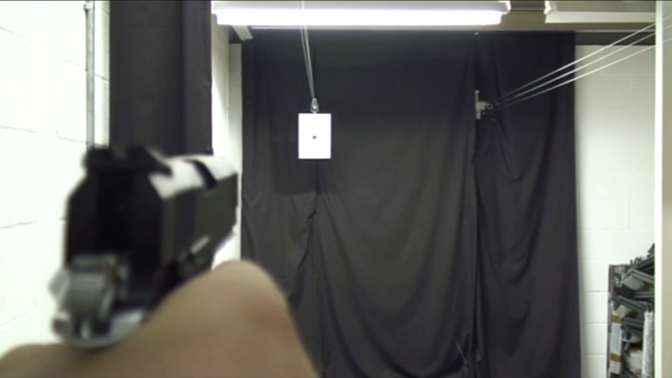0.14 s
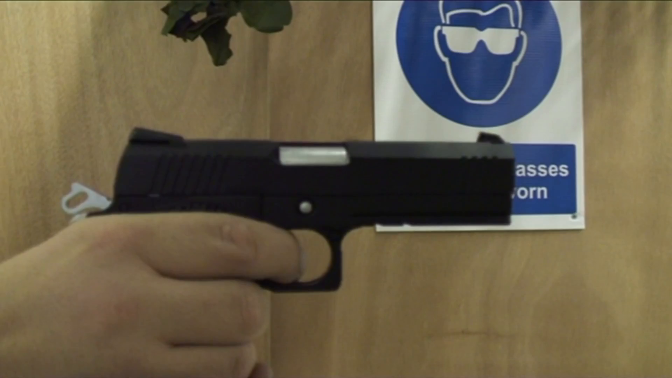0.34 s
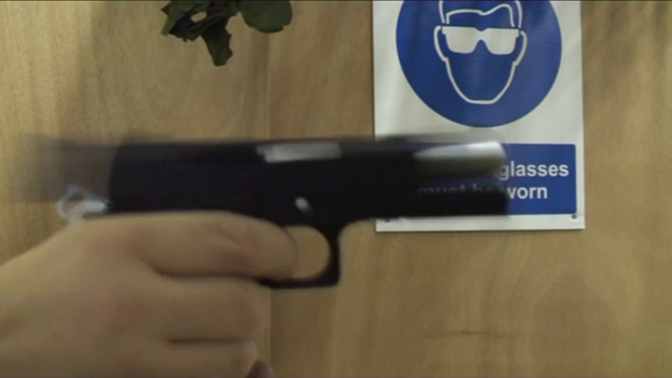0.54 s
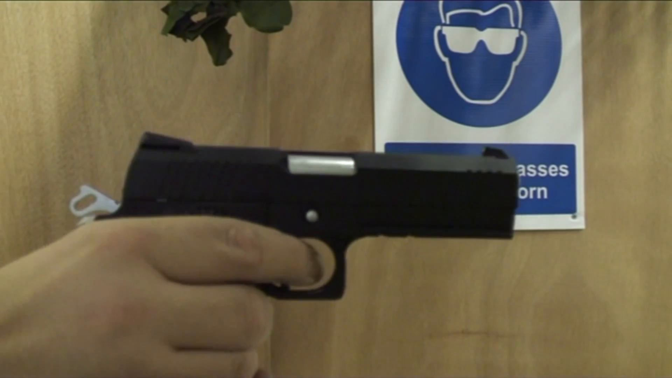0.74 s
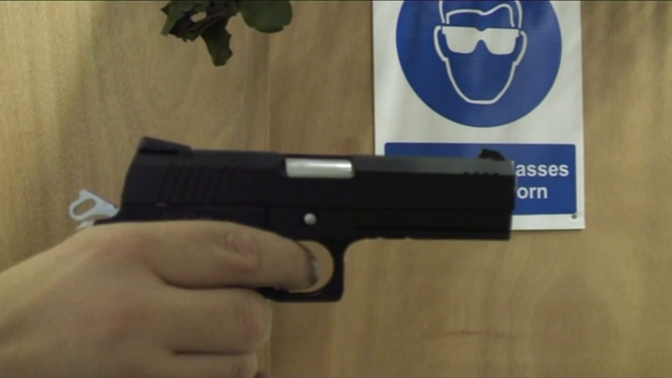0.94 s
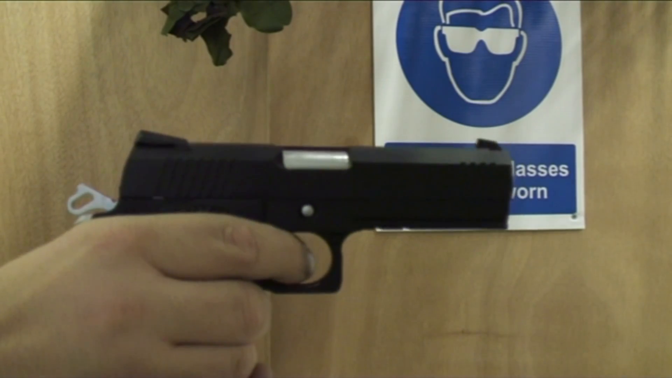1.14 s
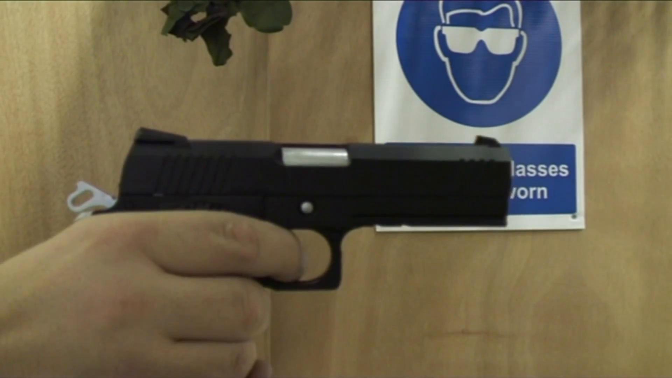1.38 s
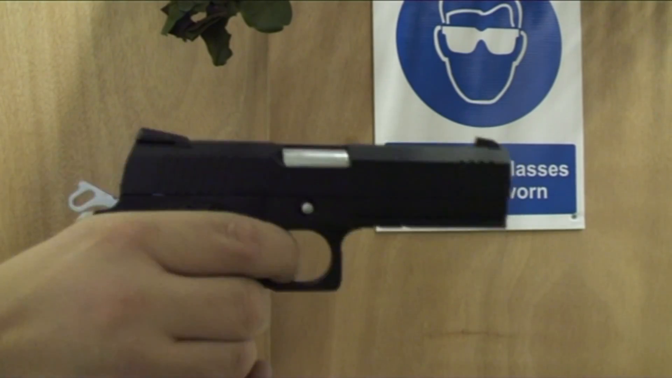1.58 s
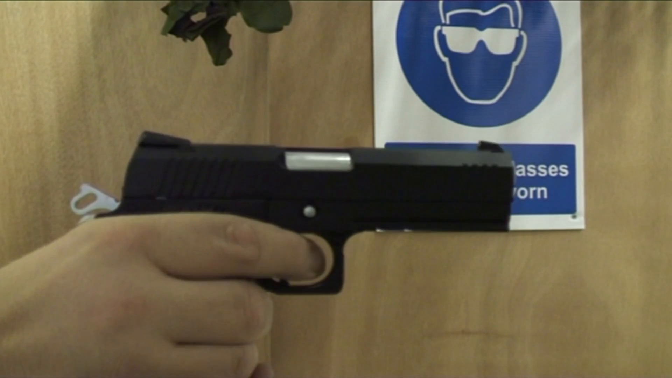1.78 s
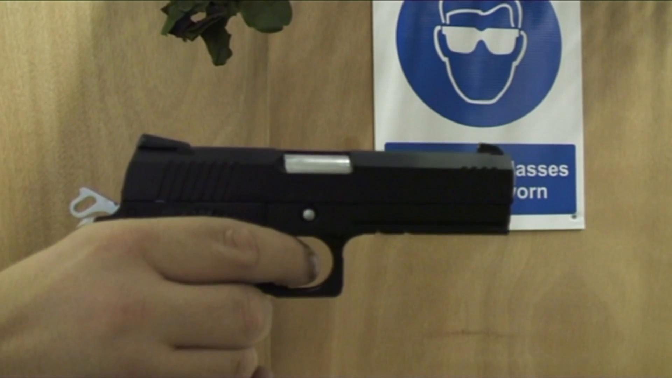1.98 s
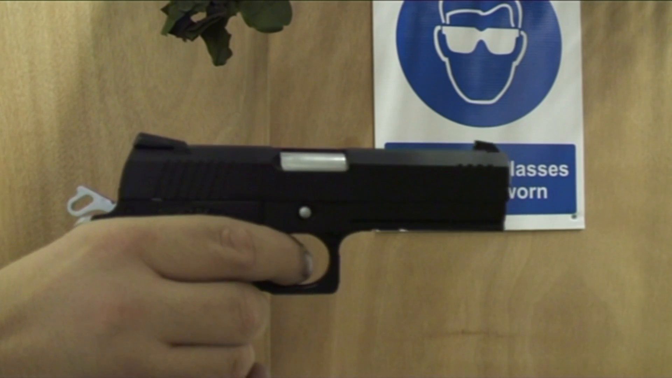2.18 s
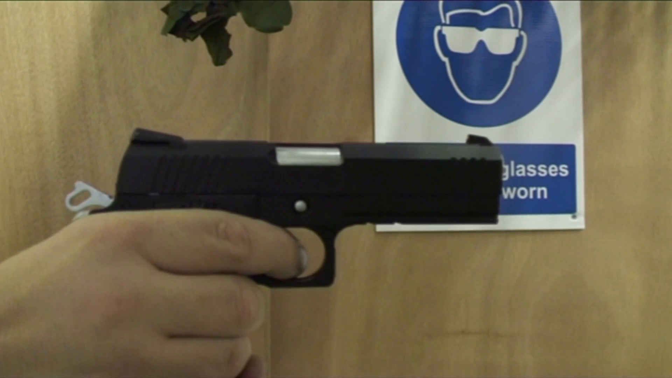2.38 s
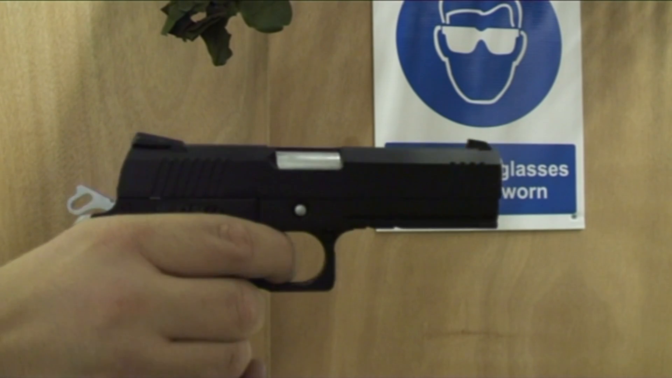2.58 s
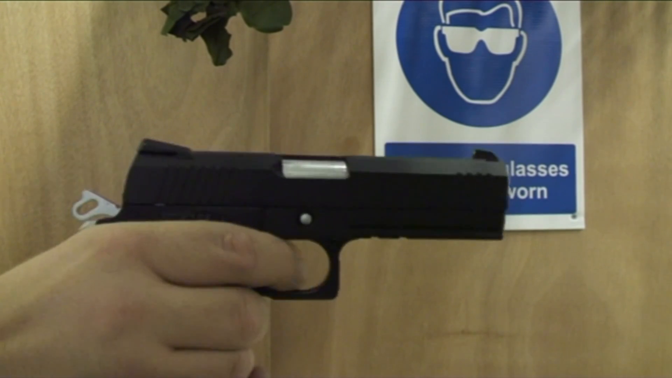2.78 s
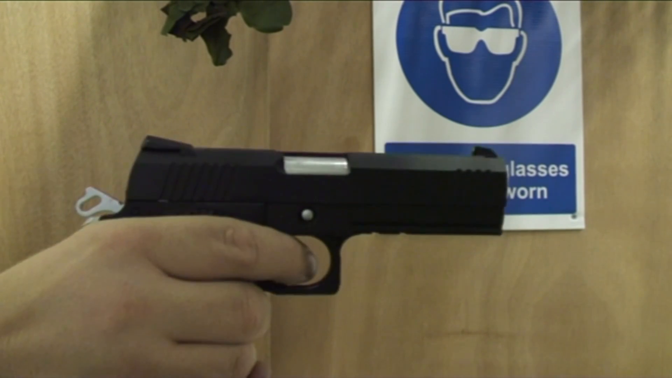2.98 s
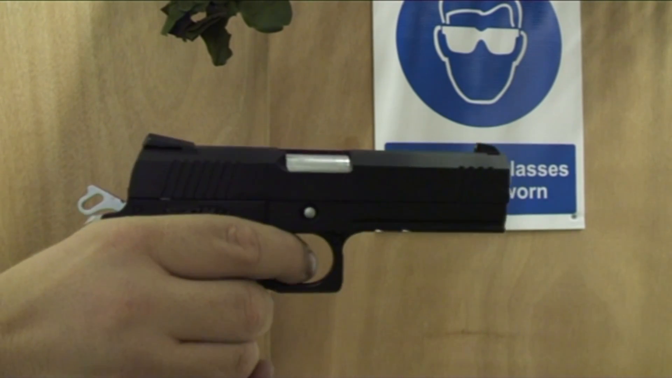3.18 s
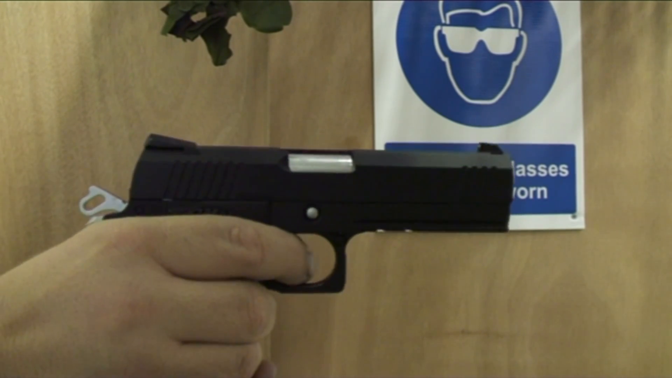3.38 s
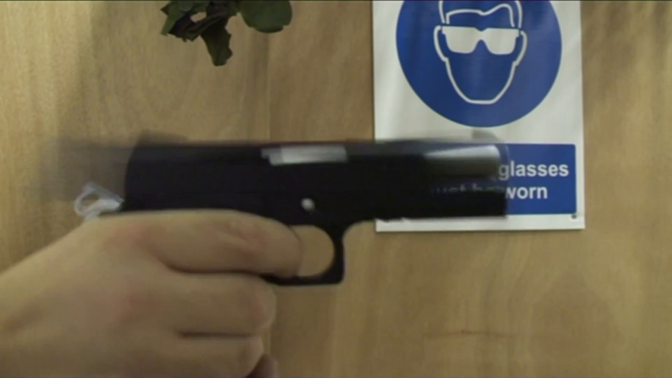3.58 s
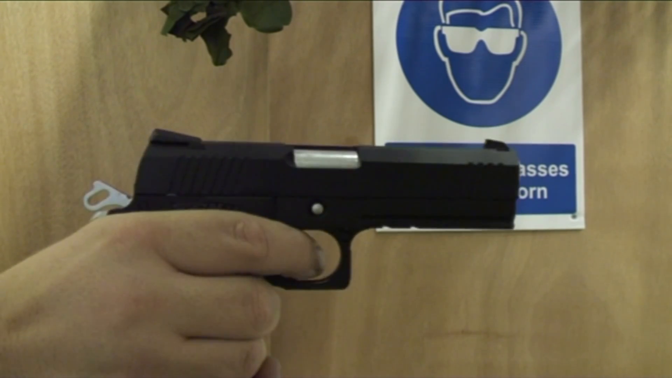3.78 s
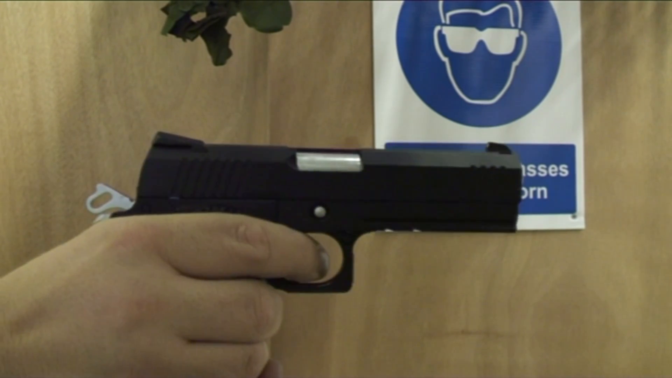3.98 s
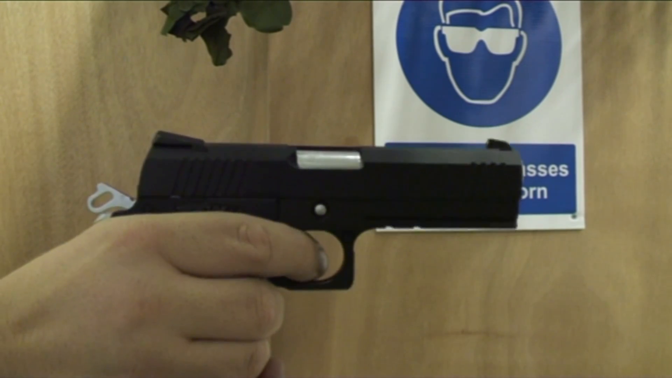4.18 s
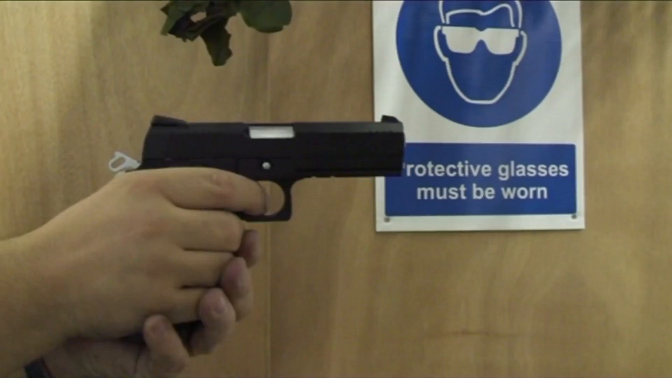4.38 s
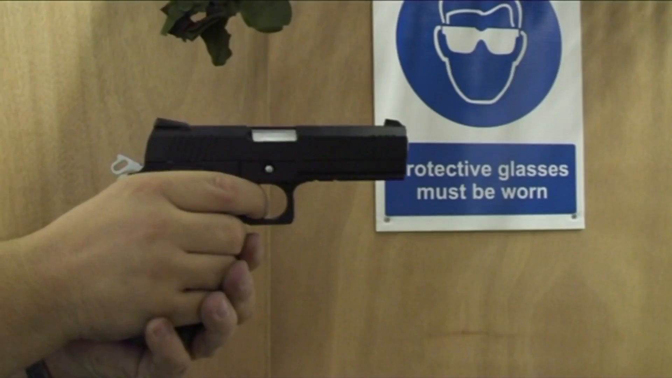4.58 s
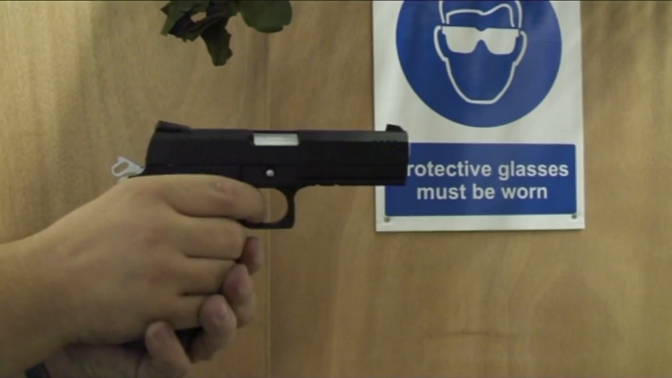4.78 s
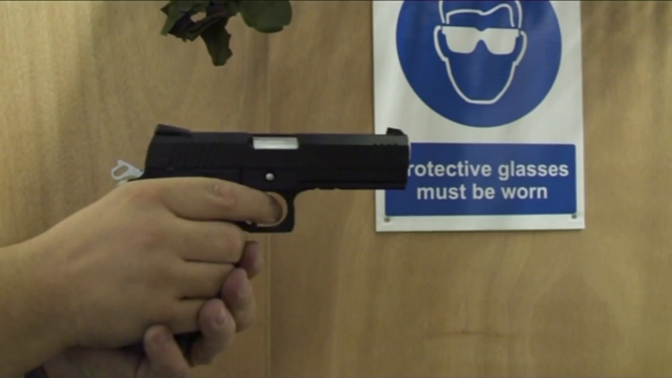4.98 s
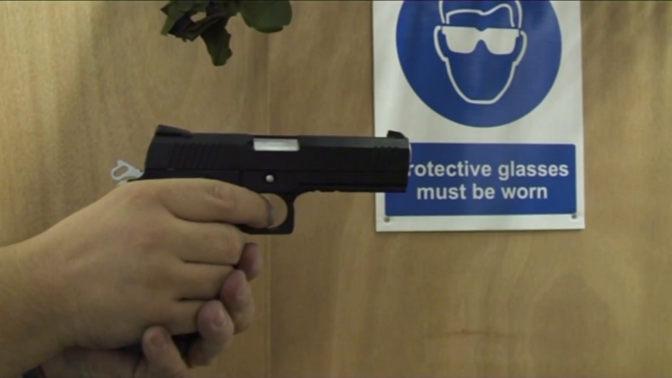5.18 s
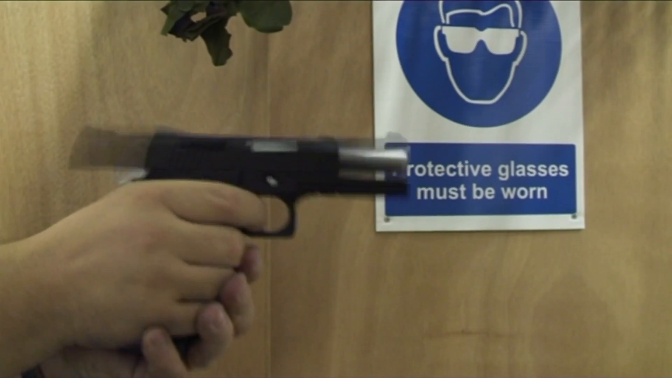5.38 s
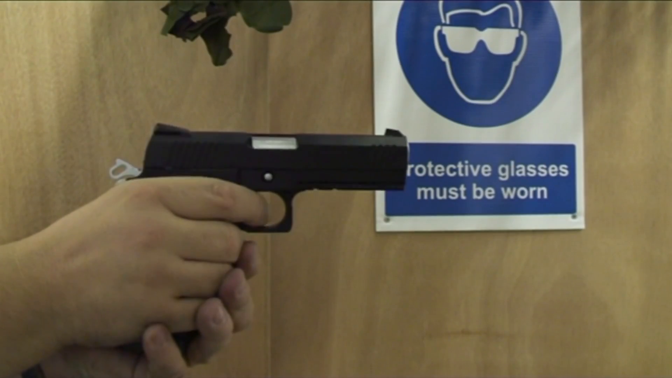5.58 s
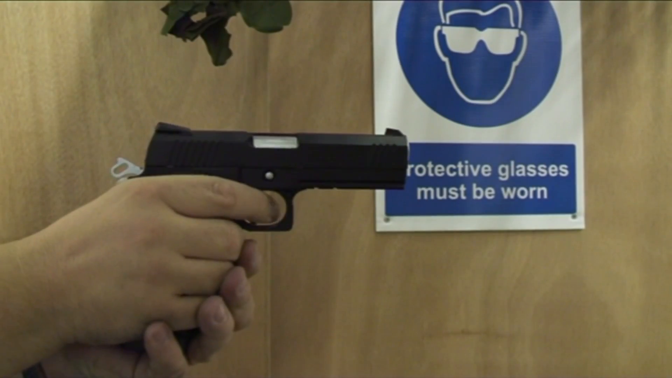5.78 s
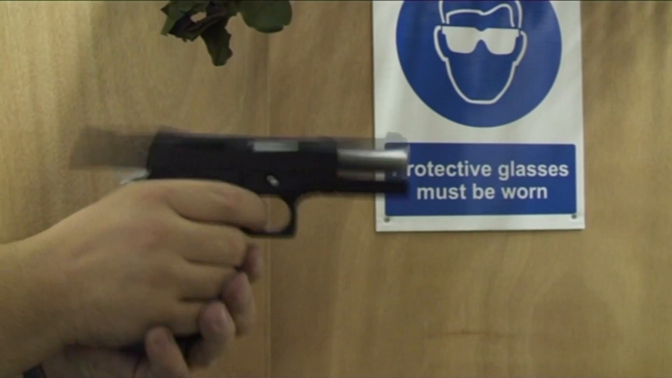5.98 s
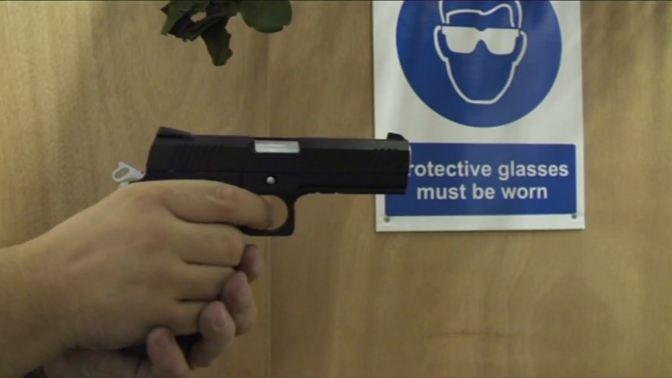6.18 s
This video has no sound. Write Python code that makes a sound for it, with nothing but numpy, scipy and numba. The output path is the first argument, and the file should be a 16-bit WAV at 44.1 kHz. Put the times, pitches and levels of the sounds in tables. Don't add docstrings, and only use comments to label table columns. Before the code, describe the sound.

Seven separate airsoft shots, roughly a second apart and quicker at the end, follow the fading ring of an earlier one. Hammer snap, airy pop, gas vent and slide clack merge into a double crack, loud enough to overload the small nearby microphone. Pellets tick at a distant target and bounce. A hard workshop echoes; low hum and hiss sit underneath.

```python
import sys
import numpy as np
from scipy import signal
from scipy.fft import rfft, irfft
from scipy.io import wavfile
from scipy.ndimage import uniform_filter1d
from numba import njit

SR = 44100
rng = np.random.default_rng(int(sys.argv[2]) if len(sys.argv) > 2 else 0)


def invert_db(level):
    return 10 ** (np.asarray(level, dtype=float) / 20)


def generate_wav(signal):
    frames = np.transpose(np.atleast_2d(signal))
    scaled = np.clip(frames, -1, 1) * 32767
    pcm = np.round(scaled).astype(np.int16)
    wavfile.write(sys.argv[1], SR, pcm)


N = 275184
LEAD = SR // 4


def add(track, s, sound):
    i = LEAD + int(s * SR)
    track[i:i + len(sound)] += sound[:max(len(track) - i, 0)]


def band(x, hz, width_hz):
    hz = min(hz, .4 * SR)
    q = hz / min(width_hz, .3 * SR)
    b, a = signal.iirpeak(hz, q, fs=SR)
    return signal.lfilter(b, a, x + 1e-15)


def burst(db, rise_ms, hold_ms, fall_ms, hz, grit_db=6.0):
    n = SR // 12
    ms = np.arange(n) * 1000 / SR
    rise = np.minimum(ms / rise_ms, 1) ** 2
    shape = rise * np.exp(-np.maximum(ms - rise_ms - hold_ms, 0) / fall_ms)
    grit = invert_db(grit_db * np.repeat(rng.standard_normal(n), 12)[:n])
    noise = rng.standard_normal(n) * grit
    sound = shape * (band(noise, hz, 1.5 * hz) + 0.6 * noise)
    return invert_db(db) * sound * np.linalg.norm(shape) / np.linalg.norm(sound)


# hz, level_db
AIR_SPECTRUM = [(20, -5.5), (100, -5), (200, 4.5), (450, 1.5), (1000, -.5), (2000, -7), (5000, -11.5),
                (15500, -11.5)]


def air_hiss(db):
    hz, level_db = np.transpose(AIR_SPECTRUM)
    bins_hz = np.fft.rfftfreq(N, 1 / SR)
    tilt = invert_db(np.interp(np.log(bins_hz + 1), np.log(hz), level_db))
    noise = irfft(rfft(rng.standard_normal(N)) * tilt, N)
    return invert_db(db) * noise / np.std(noise)


def background():
    hum_hz, hum_db = 150, -54
    hum = np.sqrt(2) * invert_db(hum_db) * np.sin(2 * np.pi * hum_hz * np.arange(N) / SR)
    return hum + air_hiss(-63)


# hz, level_db, t60_s
ROOM_BANDS = [(45, -20.5, .5), (90, -23, 1), (180.3, 6.5, 0.77), (384.5, 9, 0.58), (754, 13, 0.62),
              (1350, 8, 0.67), (2510, 4, 0.67), (5150, 3, 0.57), (9800, -1, 0.43), (11500, 2, 0.2),
              (13800, -3.5, 0.14)]


def room(x, build_s=0.015):
    t = np.arange(SR) / SR
    echo = 0
    for hz, db, t60_s in ROOM_BANDS:
        edges_hz = [hz * .72, min(hz * 1.3, .4 * SR)]
        sos = signal.butter(3, edges_hz, "band", fs=SR, output="sos")
        noise = signal.sosfilt(sos, rng.standard_normal(SR))
        echo = echo + invert_db(db - 60 * t / t60_s) * noise
    echo = echo * (1 - np.exp(-t / build_s))
    return invert_db(-7.5) * signal.fftconvolve(x, echo / np.linalg.norm(echo))[:len(x)]


def even_out(x, smooth_hz=350):
    spectrum = rfft(x)
    power = uniform_filter1d(np.abs(spectrum) ** 2, 1 + int(smooth_hz * len(x) / SR))
    evened = spectrum * np.sqrt(np.abs(power)) / (np.abs(spectrum) + 1e-12)
    return irfft(evened, len(x))


# hz, width_hz, level_db
BODY_MODES = [(2326, 426, -3.5), (3870, 280, -5.5), (5360, 64, -3), (6000, 430, -3.5), (7830, 65, 0),
              (10003, 150, -11), (11390, 290, -2)]


def body(x):
    size, between_db, bottom_hz, top_hz = 4096, -6, 324.2, 12300
    f = np.fft.rfftfreq(size, 1 / SR)
    power = invert_db(between_db) ** 2 / (1 + (f / top_hz) ** 8)
    for hz, width_hz, db in BODY_MODES:
        power = power + invert_db(db) ** 2 / (1 + (2 * (f - hz) / width_hz) ** 2)
    power = power / (1 + (bottom_hz / (f + 1)) ** 4)
    cepstrum = irfft(np.log(power) / 2, size)
    cepstrum[1:size // 2] *= 2
    cepstrum[size // 2 + 1:] = 0
    ring = irfft(np.exp(rfft(cepstrum)), size)
    return signal.oaconvolve(x, ring)[:len(x)]


# start_s, level_db, pitch_hz
BOUNCE_TICKS = [
    (1.237, -44.5, 2970),
    (2.210, -61.5, 12300),
    (2.278, -50.5, 11320),
    (3.215, -50, 12180),
    (3.275, -39.5, 504),
    (3.276, -36, 1960),
    (4.041, -47, 10500),
    (4.591, -64, 11920),
]
# start_s, level_db, pitch_hz
LANDING_TICKS = [
    (2.265, -53.5, 9800),
    (3.285, -40, 2950),
    (3.571, -43.5, 11690),
    (4.334, -47.5, 10130),
    (5.414, -39.5, 2930),
    (5.420, -45, 4570),
]
# start_s, level_db, pitch_hz
NEAR_TICKS = [(.533, -60.5, 3930), (1.368, -42, 6715), (1.400, -46, 5350), (1.566, -46.5, 2700),
              (2.550, -55, 5000), (2.577, -44, 4400), (2.701, -47.5, 2700), (3.274, -34, 3270),
              (3.469, -56, 6000), (3.503, -42.5, 6500), (3.619, -54, 2700), (3.627, -50, 2700),
              (4.394, -53.5, 4500), (5.329, -38, 8000), (5.333, -42, 8000), (5.340, -38, 7900),
              (5.979, -34.5, 11500), (5.992, -41, 9850), (6.031, -54.5, 11200)]
# hz, width_hz, level_db
STEEL_PARTS = [(2720, 220, 3), (4350, 280, 4), (6050, 300, 4), (9000, 400, 1), (11700, 400, 1)]


def ticks():
    direct, send = np.zeros((2, N + LEAD))
    target = [(s + flight_ms / 1000, -19, 9500) for s, *_, flight_ms in SHOT_CYCLES]
    groups = ((NEAR_TICKS, -22), (LANDING_TICKS, -13.5), (BOUNCE_TICKS, -1.05), (target, -26.5))
    for rows, room_db in groups:
        for s, db, hz in rows:
            tick = burst(db + 3, .2, .8, 1.6, hz)
            for _ in range(2):
                tick = band(tick, hz, 1.5 * hz)
            add(direct, s, tick)
            add(send, s, invert_db(room_db + 17.5) * even_out(tick, smooth_hz=884))
    ringing = sum(invert_db(db) * band(direct, hz, width_hz) for hz, width_hz, db in STEEL_PARTS)
    return .9 * body(direct) + ringing, send


def puff(db, hz, cycles):
    turns = np.arange(int(4 * SR / hz)) * hz / SR - 2
    return invert_db(db) * np.sin(2 * np.pi * turns) * np.exp(-.5 * (turns / cycles) ** 2)


def gas_puffs(shots):
    gas = np.zeros(N + LEAD)
    for s, pressure_db, vent_ms in shots:
        for ms, db, hz, cycles in ((1.1, 0, 780, 0.61), (vent_ms + .45, 4.6, 479, 0.44)):
            add(gas, s + ms / 1000 - 2 / hz, puff(db + pressure_db, hz, cycles))
    return gas


# after_pop_ms, level_db, rise_ms, hold_ms, fall_ms, pitch_hz
FIRING_STAGES = [
    (-8, -3, 2, 1.2, 7, 5000),
    (0, 8.5, 1.2, 3.4, 4.5, 4000),
]
# after_vent_ms, level_db, rise_ms, hold_ms, fall_ms, pitch_hz
RECOIL_STAGES = [
    (-1.26, 5.5, 0.56, 0.45, 1.5, 3400),
    (2.5, 8.5, 0.06, 3.2, 3.8, 3900),
    (7.5, 2.5, 1.8, 0.51, 5.5, 24000),
    (13.5, -10.5, 4.2, 90, 8.9, 3700),
]


def slide_clatter(shots, chamber, slams):
    clatter = np.zeros(N + LEAD)
    for s, pressure_db, vent_ms in shots:
        for start_ms, stages in ((0, FIRING_STAGES), (vent_ms, RECOIL_STAGES)):
            for ms, db, *shape in stages:
                add(clatter, s + (start_ms + ms) / 1000, burst(db + pressure_db, *shape))
    for s, db in chamber:
        add(clatter, s, burst(db + 9, .15, .7, 1.2, 8000))
    for s, db, scrape_ms in slams:
        add(clatter, s - scrape_ms / 1000, burst(db + 7.5, scrape_ms, .4, 4.5, 7000))
        add(clatter, s, burst(db + 17, 0.53, 0.55, 3.8, 3500))
    return body(clatter)


def pistol(shots, chamber, slams):
    gas_room_db, far_wall_s, far_wall_db = -3.5, .088, -3.5
    clatter, gas = slide_clatter(shots, chamber, slams), gas_puffs(shots)
    far_wall = invert_db(gas_room_db + far_wall_db) * np.roll(gas, int(far_wall_s * SR))
    out = clatter + gas + invert_db(gas_room_db) * room(gas)
    for s, *_ in shots:
        i = LEAD + int(s * SR) - SR // 200
        part = slice(i, i + SR // 6)
        send = even_out(clatter[part]) + far_wall[part]
        add(out, (i - LEAD + .5) / SR, room(np.pad(send, (0, SR))))
    return out


# pop_s, gas_pressure_db, slide_home_ms, chamber_click_before_home_ms, pellet_on_target_ms
SHOT_CYCLES = [
    (.6126, 0, 62.4, 16.5, 188),
    (1.5938, -1, 64.9, 18.2, 199),
    (2.7238, -1, 63.2, 16, 194),
    (3.6451, -.6, 62.9, 14.2, 204),
    (4.7697, -2.1, 63.5, 12.7, 193),
    (5.4911, -2.5, 61.2, 13.3, 208),
    (6.0921, -1.5, 66.2, 13.8, 200),
]


def cycle(rows):
    lug_ms, lug_db, scrape_ms = 5.1, -4, 5.2
    shots, chamber, slams = [], [], []
    for k, (s, pressure_db, home_ms, click_ms, _) in enumerate(rows):
        home_s = s + home_ms / 1000
        click_db = -1.5 - 2.2 * k
        shots.append((s, pressure_db, 12.2 + .13 * k))
        chamber.append((home_s - click_ms / 1000, click_db))
        chamber.append((home_s - lug_ms / 1000, click_db + lug_db))
        slams.append((home_s, -5 + 0.2 * k, scrape_ms))
    return shots, chamber, slams


def earlier_shot():
    s, db = -0.047, -1
    shot = pistol([(s, db, 12.5)], [(s + .048, db - 6.5)], [(s + .066, db - 5.5, 5)])[LEAD:]
    behind = shot + invert_db(-5) * band(shot, 6200, 1300)
    return behind * (np.arange(N) < TAKE_LEVELS[1][0] * SR)


def scene():
    earlier = earlier_shot()
    direct, send = ticks()
    struck = pistol(*cycle(SHOT_CYCLES)) + direct + room(send, build_s=0.0034)
    mid = earlier + struck[LEAD:] + background()
    side = air_hiss(-74)
    return np.array([mid + side, mid - side])


# start_s, level_db, sag_db_per_s
TAKE_LEVELS = [
    (0, 10, -23.5),
    (0.378, 1.38, -1.11),
    (4.38, 0.5, -1.95),
]
MOTOR_START_S = (.03, .403, 4.398)


def edit():
    join_s, turned_down_s, turned_down_db = .008, .336, -14
    motor_db, motor_step_s, motor_rise_s, motor_fall_s = -61, .06, 0.0015, 0.022
    t = np.arange(N) / SR
    starts_s = np.transpose(TAKE_LEVELS)[0]
    take = np.searchsorted(starts_s[1:], t)
    start_s, db, sag = np.transpose(TAKE_LEVELS)[:, take]
    turned_down = np.clip((t - turned_down_s) / join_s + .5, 0, 1) * (t < starts_s[1])
    db = db + sag * (t - start_s) + turned_down_db * turned_down
    to_join_s = np.minimum(abs(t - starts_s[1]), abs(t - starts_s[2]))
    join = np.clip(to_join_s / join_s, .1, 1)
    since_s = (t - np.array(MOTOR_START_S)[take]) % motor_step_s
    motor = invert_db(motor_db) * (1 - np.exp(-since_s / motor_rise_s)) * np.exp(-since_s / motor_fall_s)
    return invert_db(db) * join, (motor - motor.mean()) * join


@njit
def duck(x, top, slope, attack, hold, release):
    gain, e, wait = np.empty(len(x)), top, 0.
    for i in range(len(x)):
        if x[i] > e:
            e += (x[i] - e) * attack
            wait = hold
        elif wait > 0:
            wait -= 1
        else:
            e -= e * release
        gain[i] = (top / max(e, top)) ** slope
    return gain


def bias_drift(loud):
    rate = 1 / (0.019 * SR)
    level = signal.lfilter([rate], [1, rate - 1], np.minimum(np.abs(loud.mean(0)), 1))
    drift = signal.sosfilt(signal.butter(1, 5, "high", fs=SR, output="sos"), level)
    return np.outer((-0.34, -0.26), drift)


def roll_off(x):
    return signal.sosfilt(signal.butter(12, 15680, fs=SR, output="sos"), x)


def record(dry):
    dry = signal.sosfilt(signal.butter(1, 40, "high", fs=SR, output="sos"), dry)
    gain = duck(np.abs(dry.mean(0)), invert_db(-6.5), 0.6, 1 / (0.0033 * SR), 0.0082 * SR, 1 / (0.073 * SR))
    fader, motor = edit()
    loud = dry * gain * fader + motor
    ceiling = .945
    finished = np.clip(loud + bias_drift(loud), -ceiling, ceiling)
    return roll_off(finished)


dry = scene()
out = record(dry)
generate_wav(out)
```